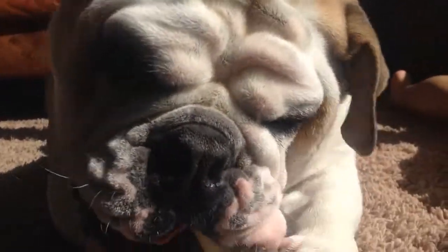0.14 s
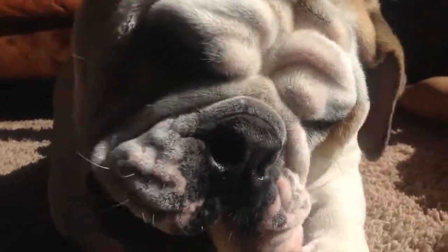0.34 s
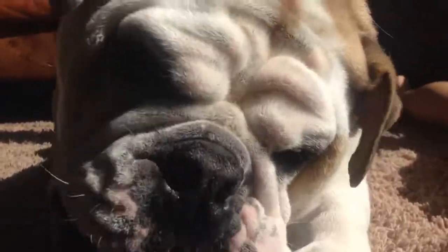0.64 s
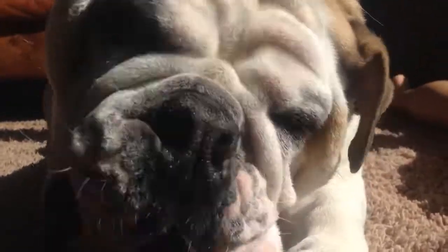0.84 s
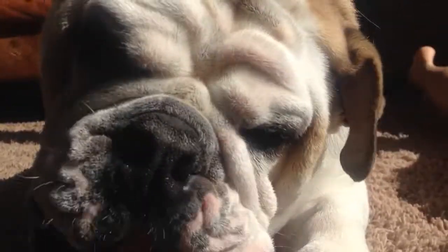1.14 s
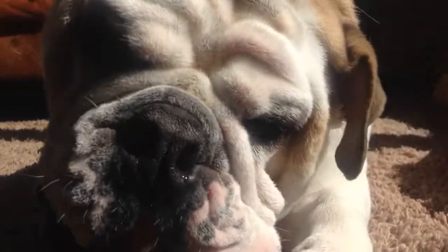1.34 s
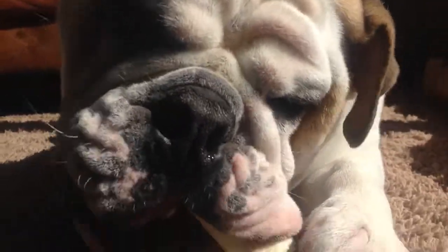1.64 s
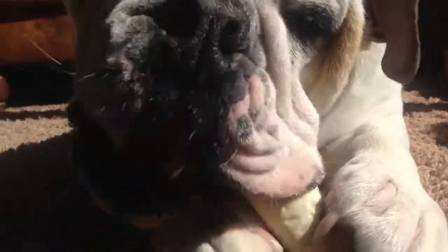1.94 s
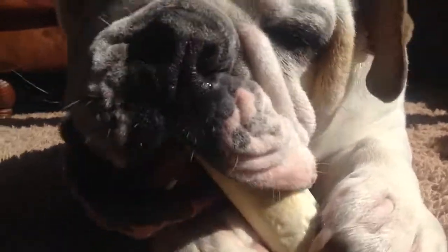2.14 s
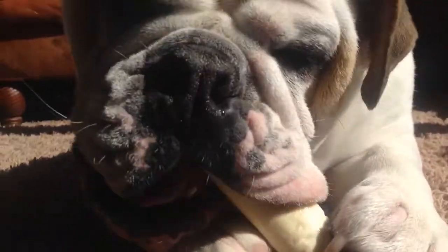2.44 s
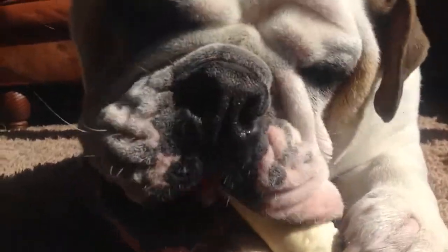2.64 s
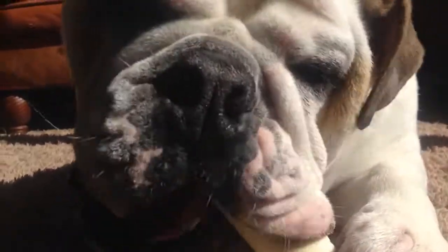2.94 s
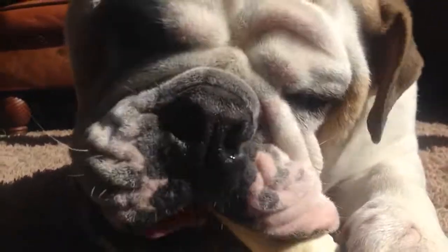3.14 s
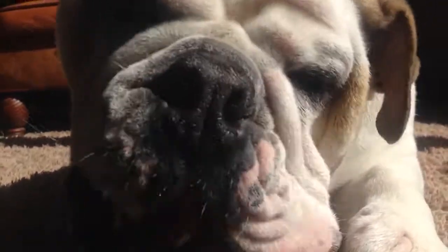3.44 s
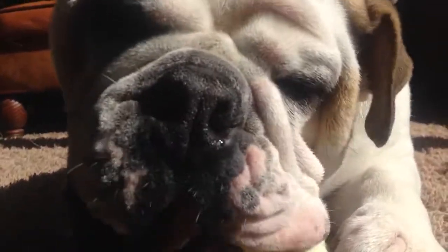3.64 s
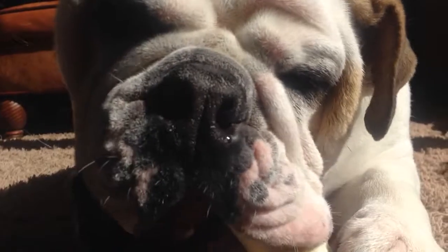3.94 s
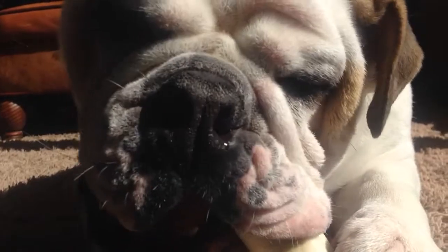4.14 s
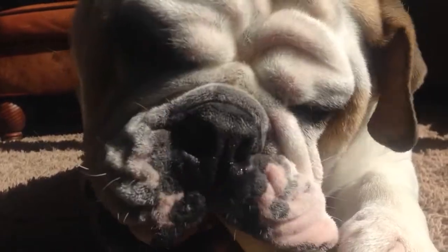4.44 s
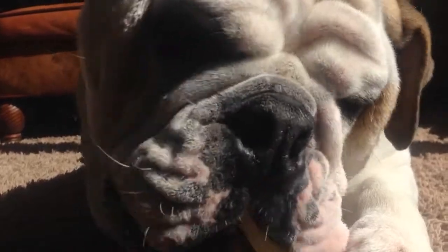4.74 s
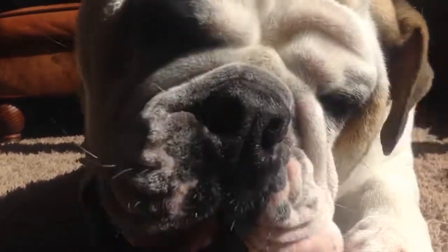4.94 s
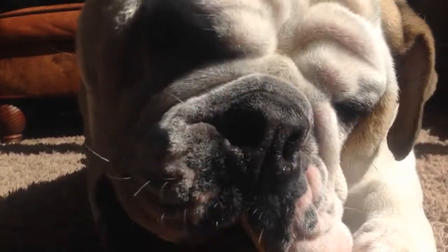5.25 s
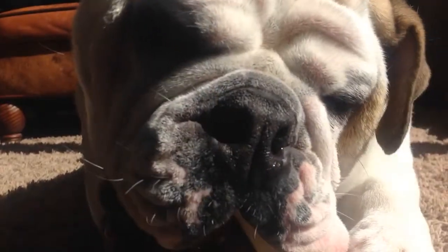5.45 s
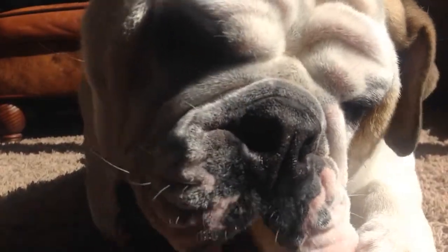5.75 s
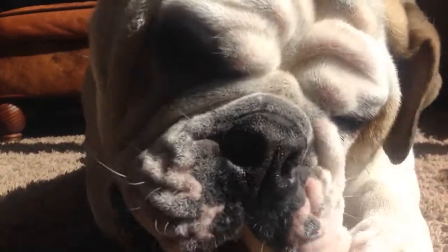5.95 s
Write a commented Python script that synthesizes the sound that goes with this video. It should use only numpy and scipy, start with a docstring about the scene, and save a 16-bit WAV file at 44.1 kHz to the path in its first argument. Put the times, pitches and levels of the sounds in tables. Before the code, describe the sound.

Close up in a small room with little echo, a soft thump and a nasal snuffle lead into a sharp crack of teeth on bone. The dog keeps chewing, with irregular clicks, hollow knocks and brief crunches, busiest around the middle. Quiet lip smacks and a few hissy puffs of breath fall between the bites, while its head and paws bump the carpet and its body rumbles low under a faint steady hiss.

```python
"""A bulldog gnawing a bone

A bulldog lies close by on a carpet, gnawing a hard chew bone. Its teeth snap off the bone in impacts
that excite the modes of tooth, bone and mouth cavity, and drag over it in short stick-slip crunches.
Lips and tongue smack, head and paws bump softly, and its shifting weight rumbles. Turbulent air
snuffles through its flat nose. A small furnished room reflects the gnawing, over a faint hiss."""
import sys
import numpy as np
from scipy import signal
from scipy.fft import rfft, irfft, next_fast_len
from scipy.io import wavfile
from scipy.ndimage import map_coordinates

SR = 44100
rng = np.random.default_rng(int(sys.argv[2]) if len(sys.argv) > 2 else 0)


def persist_wave(psi):
    """Save psi, clipped to +-1, as 16-bit WAV."""
    counts = np.round(np.clip(psi, -1, 1) * 32767).astype(np.int16)
    wavfile.write(sys.argv[1], SR, np.atleast_2d(counts).T)


N = 268569

# spectra of the hiss, the body's rumble and the nasal airflow: (frequency [Hz], relative density [dB])
HISS_SPECTRUM = [(30, -15), (150, -1.5), (260, -14), (400, -14), (600, -15.5), (740, -13.5), (1000, -18),
                 (1500, -20.5), (2300, -20.5), (2800, -17.5), (3230, -12.5), (3700, -15.5), (5500, -20),
                 (15000, -23)]
RUMBLE_SPECTRUM = [(15, -28), (30, -15.5), (60, 5.5), (100, -4.5), (170, -11), (280, -18.5), (600, -34),
                   (1500, -62.5)]
NOSE_SPECTRUM = [(300, -40.5), (800, -16), (1200, -7), (1950, -10.5), (2550, -3), (2950, -4), (3350, -1),
                 (3850, -4), (4400, -9), (4900, -10.5), (5600, -19), (11000, -40)]
# decay of the room: (frequency [Hz], reverberation time [s])
ROOM_T60 = [(150, 0.47), (1000, 0.25), (4000, .2), (12000, 0.066)]
# the dog shifts its weight: (centre time [s], Gaussian half width [s], relative level [dB])
WEIGHT_SHIFTS = [(0, 0.07, -55.5), (.55, 0.17, -65.5), (1.75, .28, -59.5), (2.45, 0.4, -67.5)]
# puffs through the nose: (start [s], duration [s], relative level [dB], nostril pitch [Hz])
PUFFS = [(-.03, 0.048, -61.5, 3400), (.25, 0.13, -65.5, 3100), (.5, 0.33, -57, 3600),
         (1.95, 0.17, -68.5, 3170), (2.2, .18, -71, 3180), (2.654, .16, -57, 3430), (4.146, .1, -71, 3197),
         (4.719, 0.23, -59, 3330)]
# bumps of head, paws and jaw, and smacks of lips and tongue: (time [s], peak level [dB], pitch [Hz])
SOFT_BUMPS = [(0.059, -26, 90), (.704, -33.5, 87.5), (1.632, -37, 80), (1.671, -33, 93),
              (1.78, -28.5, 102), (1.801, -32.5, 80), (1.842, -41, 123.5), (1.915, -37.5, 83.5),
              (2.169, -37, 70), (2.547, -31, 169), (2.612, -37.5, 122), (4.39, -37.5, 121),
              (4.671, -42.5, 86.5), (5.625, -43.5, 87), (5.862, -36, 107)]
LIP_SMACKS = [(.05, -47.5, 640), (.335, -53, 410), (.66, -45.5, 930), (1.069, -55, 410), (1.582, -49, 426),
              (1.622, -43.5, 329), (2.033, -47.5, 760), (2.147, -54.5, 380), (2.607, -56.5, 550),
              (2.813, -52.5, 1200), (3.281, -56.5, 577), (3.427, -43, 1150), (3.913, -56.5, 870),
              (4.803, -46, 560)]
# modes of the bone and the teeth: (frequency [Hz], bandwidth [Hz], relative level [dB])
BONE_LOW_MODES = [(215, 66, -6.5), (398, 60, -6), (520, 120, -3), (736, 38, 1), (1013, 100, -8)]
BONE_HIGH_MODES = [(1494, 120, 2.5), (1860, 180, -5.5), (2427, 220, -9.5)]
TEETH_MODES = [(2448, 300, -13.5), (3250, 310, -2.5), (3940, 350, -13.5)]
# a tooth drags over the bone: (start [s], duration [s], peak level [dB])
TOOTH_DRAGS = [(1.185, .011, -27.5), (1.546, 0.014, -44.5), (1.9585, 0.0039, -32), (2.429, 0.031, -41.5),
               (2.528, 0.027, -39), (2.896, .014, -37.5), (2.952, 0.0098, -32), (3.079, 0.012, -33),
               (3.089, .012, -33), (4.378, 0.026, -40.5), (5.858, 0.0084, -36)]
# a tooth slips and strikes: (time [s], mouth level [dB], mouth pitch [Hz], mouth bandwidth [Hz],
# bone knock level [dB], bone crack level [dB], tooth tick level [dB], tooth pitch [Hz])
TOOTH_STRIKES = [(0.5412, -12.5, 1260, 355, -32.5, -15.5, -24, 3140),
                 (0.59, -45, 940, 600, -46.5, -45, -41, 3950),
                 (.908, -43.5, 1340, 600, -48, -63, -52, 2930),
                 (0.9612, -25, 1120, 600, -38, -19.5, -44, 3420),
                 (.972, -37, 960, 310, -61, -46, -29.5, 2540),
                 (1.191, -27.5, 1150, 600, -26.5, -31.5, -35, 3720),
                 (1.503, -30.5, 956, 500, -33.5, -30, -41, 3170),
                 (1.5535, -39.5, 1630, 130, -43, -69, -44, 4500),
                 (1.6466, -48, 1130, 480, -40, -53, -58, 4450),
                 (1.963, -16.5, 1254, 305, -38.5, -16, -48, 3180),
                 (1.996, -37, 1300, 600, -29, -45, -43.5, 4200),
                 (2.4397, -37, 1026, 276, -30.5, -39, -50, 3600),
                 (2.5444, -22, 1340, 410, -23, -28, -35.5, 2290),
                 (2.8836, -15.5, 1237, 353, -36, -55, -33, 4200),
                 (2.9629, -24.5, 1060, 170, -28, -33, -38, 3110),
                 (3.094, -21, 1500, 188, -21, -50, -36, 4470),
                 (3.101, -29, 1103, 140, -30.5, -29, -36, 3510),
                 (3.3406, -82, 1020, 600, -75, -70, -46, 4360),
                 (3.441, -19, 1215, 270, -39, -56, -32, 4080),
                 (3.999, -44, 1010, 248, -40, -42.5, -40.5, 2670),
                 (4.3922, -32.5, 1016, 171, -37, -48, -53, 4100),
                 (4.42, -63, 1030, 600, -45.5, -53, -62, 4350),
                 (4.898, -56, 1100, 300, -57, -66, -31, 4200),
                 (4.9142, -14, 1084, 159, -38, -41, -31, 3310),
                 (4.9599, -30.5, 1060, 130, -45.5, -74, -63, 3020),
                 (4.975, -47, 1020, 130, -47, -70, -63, 4500), (5.3138, -50, 910, 600, -36, -71, -63, 4240),
                 (5.3399, -34, 1007, 172, -41.5, -78, -69, 4600),
                 (5.361, -48, 1000, 160, -49, -78, -66, 4600),
                 (5.39, -42.5, 1140, 131, -41, -80, -56, 4330),
                 (5.7837, -32, 1070, 157, -36, -72, -52.5, 4240),
                 (5.871, -22, 1030, 360, -29.5, -65, -36, 4300)]

RING = 4096  # samples in one impulse response
HZ = np.fft.rfftfreq(RING, 1 / SR)


def amp(db):
    """Amplitude ratio of a level in decibels."""
    return 10 ** (np.asarray(db) / 20)


def unit(x):
    """Normalisation to rms 1."""
    return x / np.sqrt(np.mean(x ** 2) + 1e-20)


def crest(x):
    """Normalisation to peak 1."""
    return x / (np.abs(x).max() + 1e-20)


def along(points, hz):
    """Interpolation of (frequency, value) points on a logarithmic frequency axis."""
    frequencies, values = np.transpose(points)
    return np.interp(np.log(hz + 1), np.log(frequencies + 1), values)


def add(track, start_s, sound):
    """Superposition of a sound on the track."""
    part = track[max(round(start_s * SR), 0):][:len(sound)]
    part += sound[:len(part)]


def filtered(x, response):
    """Linear filtering: the spectrum is multiplied by a frequency response."""
    size = next_fast_len(N + SR // 2)
    return irfft(rfft(x, size) * response(np.fft.rfftfreq(size, 1 / SR)), size)[:N]


def noise(spectrum):
    """Spectral shaping of white noise, at rms 1."""
    return unit(filtered(rng.standard_normal(N), lambda hz: amp(along(spectrum, hz))))


def resonance(hz, width_hz):
    """Frequency response of a damped harmonic oscillator."""
    return 1j * HZ * width_hz / (hz * hz - HZ ** 2 + 1j * HZ * width_hz)


def modal_sum(modes, centre_hz, width_hz):
    """Modes of alternating sign superpose under one broad resonance; their levels vary with each blow."""
    scatter_db = rng.standard_normal(len(modes))
    total = sum((-1) ** k * amp(db + scatter_db[k]) * resonance(hz, width)
                for k, (hz, width, db) in enumerate(modes))
    return resonance(centre_hz, width_hz) * total


def ring(response, contact_hz):
    """Impulse response of peak 1; a tooth's finite contact time acts as a low-pass filter."""
    low_pass = 1 / (1 - (HZ / contact_hz) ** 2 + 1.2j * HZ / contact_hz)
    return crest(irfft(response * low_pass ** 2))


def hiss(level_db):
    """Stationary broadband noise forms a faint background."""
    return amp(level_db) * noise(HISS_SPECTRUM)


def room(direct, early_db, tail_db, early_t60_s):
    """Early reflections from floor and furniture, and weak reverberation from walls, join the sound."""
    hz, t, spectra = signal.stft(rng.standard_normal(SR // 2), SR, nperseg=256)
    decay = amp(-60 * t / along(ROOM_T60, hz)[:, None])
    tail = signal.istft(spectra * decay, SR, nperseg=256)[1]
    early = rng.standard_normal(len(tail)) * amp(-60 * np.arange(len(tail)) / SR / early_t60_s)
    reflections = amp(early_db) * early / np.linalg.norm(early)
    reflections += amp(tail_db) * tail / np.linalg.norm(tail)
    delayed = np.pad(reflections, (int(0.003 * SR), 0))
    return direct + signal.fftconvolve(direct, delayed)[:N]


def shuffle(gain_db, lump_db, lumps_per_s=22, rest_db=-72):
    """Amplitude-modulated rumble swells as the dog shifts its weight; the shifts add in power."""
    t = np.arange(N) / SR
    lumps = map_coordinates(rng.standard_normal(N * lumps_per_s // SR + 4), [t * lumps_per_s])
    rumble = unit(amp(lump_db * np.tanh(lumps)) * noise(RUMBLE_SPECTRUM))
    shift_power = sum((amp(db) * np.exp(-((t - centre_s) / half_s) ** 2 / 2)) ** 2
                      for centre_s, half_s, db in WEIGHT_SHIFTS)
    return amp(gain_db) * np.sqrt(amp(rest_db) ** 2 + shift_power) * rumble


def snuffles(gain_db, whistle_db, half_width_hz):
    """Turbulent air hisses and faintly whistles in narrow nostrils; their opening sets the pitch."""
    attack_s, sag_db_per_s, release_db_per_s = 0.092, 17.5, 59.5
    reference_hz = 3350  # nostril pitch of the unshifted spectrum
    track = np.zeros(N)
    for start_s, length_s, db, hz in PUFFS:
        t = np.maximum(np.arange(N) / SR - start_s, 0)
        swell = np.sin(np.pi / 2 * np.minimum(t / attack_s, 1)) ** 2
        sag_db = sag_db_per_s * np.maximum(t - attack_s, 0)
        release_db = release_db_per_s * np.maximum(t - length_s, 0)
        air = noise([(f * hz / reference_hz, density_db) for f, density_db in NOSE_SPECTRUM])
        whistle = unit(filtered(air, lambda f: 1 / (1 + ((f - hz) / half_width_hz) ** 2)))
        track += amp(db - sag_db - release_db) * swell * unit(air + amp(whistle_db) * whistle)
    return amp(gain_db) * track


def bumps(decay_cycles, jaw_hz=160, jaw_offset_db=-22, jaw_db_per_db=0.65):
    """Padded impacts last about a cycle: head and paws bump the carpet, and bone knocks thump the jaw."""
    track = np.zeros(N)
    t = np.arange(-RING // 2, RING // 2) / SR
    jaw_thumps = [(time_s, jaw_offset_db + jaw_db_per_db * knock_db, jaw_hz)
                  for time_s, _, _, _, knock_db, *_ in TOOTH_STRIKES]
    for time_s, db, hz in SOFT_BUMPS + jaw_thumps:
        thump = np.cos(2 * np.pi * hz * t) * np.exp(-np.abs(hz * t / decay_cycles))
        add(track, time_s - RING / SR / 2, amp(db) * thump)
    return track


def smacks(swell_s, tongue_per_s=4.5, tongue_db=-60.5, tongue_hz=651):
    """Cavity resonance: wet lips and tongue part, exciting a cheek pocket; fainter ticks fall at random."""
    track = np.zeros(N)
    age = np.arange(RING) / SR / swell_s
    tongue_ticks = [(k / tongue_per_s + 0.1 * late, tongue_db + 3 * size, tongue_hz * np.exp(0.4 * pitch))
                    for k, (late, size, pitch) in enumerate(rng.standard_normal((40, 3)))]
    for time_s, db, hz in LIP_SMACKS + tongue_ticks:
        flutter = rng.standard_normal(RING) * age * np.exp(-age)
        pocket = resonance(hz, 0.25 * hz) * resonance(hz, 0.8 * hz)
        add(track, time_s, amp(db) * crest(irfft(rfft(flutter) * pocket)))
    return track


def bone_knock():
    """Damped free vibration: the bone, held between the paws, rings briefly in its low modes."""
    return ring(modal_sum(BONE_LOW_MODES, centre_hz=650.4, width_hz=913), contact_hz=1500)


def bone_crack():
    """A sharp impact excites the bone's upper modes, in opposite polarity to the low ones."""
    return -ring(modal_sum(BONE_HIGH_MODES, centre_hz=1681, width_hz=1266), contact_hz=5000)


def splinter(decay_s):
    """Brittle fracture: a chip breaks away with a brief, bright crackle."""
    crackle = rng.standard_normal(RING) ** 3 * np.exp(-np.arange(RING) / SR / decay_s)
    return ring(rfft(crackle) * resonance(4600, 2500), contact_hz=9000)


def tooth_tick(hz):
    """A struck tooth rings at its natural frequency, over the fainter modes of its neighbours."""
    tooth = resonance(hz, 300) * resonance(hz, 1100)
    neighbours = modal_sum(TEETH_MODES, centre_hz=3220, width_hz=2500)
    return ring(tooth + neighbours, contact_hz=5000)


def scrapes(slips_per_s, knock_db, grit_db):
    """Stick-slip friction: each uneven slip of a dragging tooth is a tiny impact that frees a crumb."""
    track = np.zeros(N)
    for start_s, length_s, db in TOOTH_DRAGS:
        drag = np.zeros(2 * RING)
        slip_times = (np.cumsum(rng.uniform(0.3, 1.7, size=48)) - 0.3) / slips_per_s
        scatter = rng.standard_normal((len(slip_times), 2))
        slip_times = slip_times[slip_times <= max(length_s, slip_times[0])]  # at least one slip
        strike = tooth_tick(3250) + amp(knock_db) * bone_knock()
        for slip_s, (pitch, size) in zip(slip_times, scatter):
            crumb = ring(resonance(1500 * np.exp(0.4 * pitch), 340), contact_hz=4116)
            add(drag, slip_s, amp(1.1 * size) * (strike + amp(grit_db) * crumb))
        add(track, start_s, amp(db) * crest(drag))
    return track


def bites(splinter_db, hardness, rebound_s=0.0035, rebound_db=-15):
    """Impact excitation: each strike rings mouth cavity, bone and tooth, and the tooth rebounds once."""
    track = np.zeros(N)
    for time_s, mouth_db, mouth_hz, width_hz, knock_db, crack_db, tick_db, tooth_hz in TOOTH_STRIKES:
        # a harder blow has a shorter contact, so the mouth rings brighter
        sharpness = max(amp(hardness * (mouth_db + 46.5)), 1.2)
        cavity = resonance(mouth_hz, width_hz) * resonance(mouth_hz, mouth_hz / 2)
        mouth = ring(cavity, contact_hz=sharpness * mouth_hz)
        tooth = tooth_tick(tooth_hz) + amp(splinter_db) * splinter(decay_s=0.0011)
        bone = amp(knock_db) * bone_knock() + amp(crack_db) * bone_crack()
        strike = amp(mouth_db) * mouth + bone + amp(tick_db) * tooth
        add(track, time_s, strike)
        delay_s = rebound_s * np.exp(0.22 * rng.standard_normal())
        add(track, time_s + delay_s, amp(rebound_db) * strike)
    return track


def scene():
    """Superposition of the gnawing and its reflections with rumble, breath and hiss."""
    gnawing = bites(splinter_db=-19, hardness=0.21)
    gnawing += scrapes(slips_per_s=1001, knock_db=10.0, grit_db=13)
    gnawing += smacks(swell_s=0.0027)
    gnawing += bumps(decay_cycles=0.53)
    background = hiss(level_db=-65)
    gnawing_in_room = room(gnawing, early_db=-13.5, tail_db=-24, early_t60_s=0.06)
    breath = snuffles(gain_db=1.0, whistle_db=-8, half_width_hz=250)
    rumble = shuffle(gain_db=7.0, lump_db=5.5)
    return (background + rumble + breath + gnawing_in_room)[None]


def record(dry):
    """Band limiting: an ideal low-pass filter removes everything above 15450 Hz."""
    return filtered(dry[0], lambda hz: hz < 15450)[None]


dry = scene()
out = record(dry)
persist_wave(out)
```